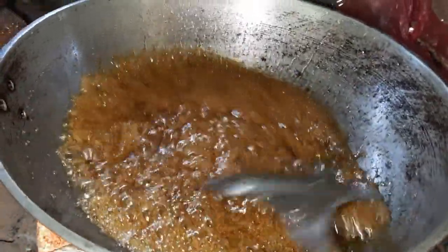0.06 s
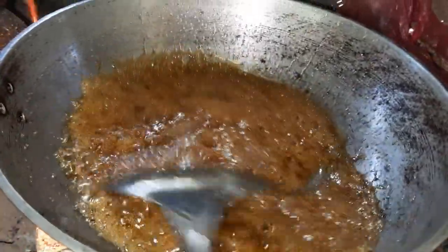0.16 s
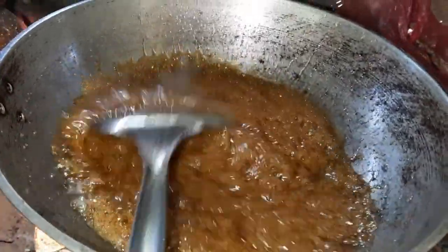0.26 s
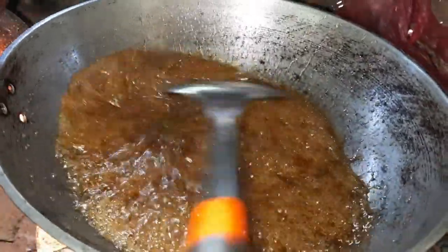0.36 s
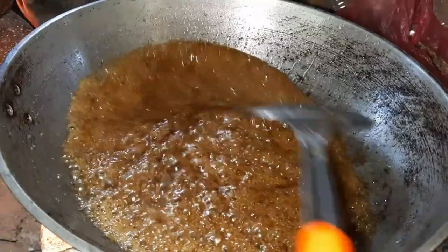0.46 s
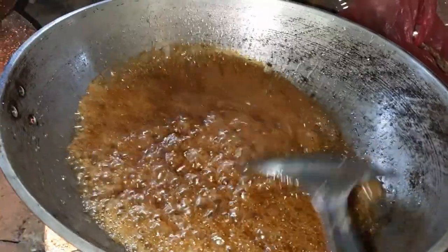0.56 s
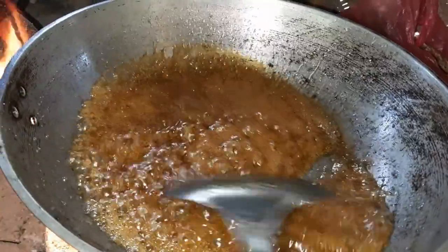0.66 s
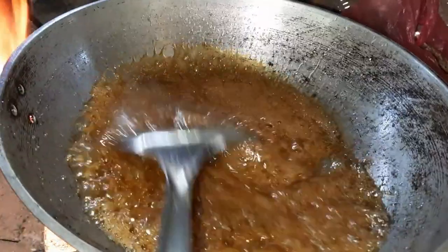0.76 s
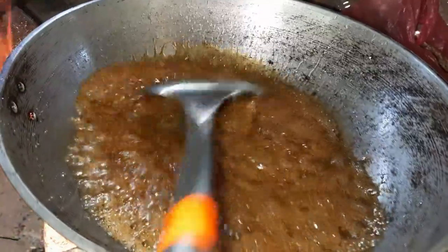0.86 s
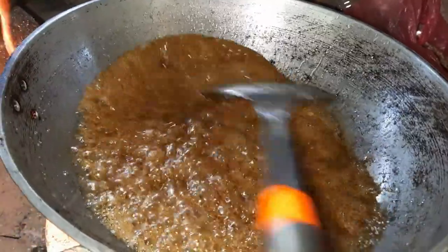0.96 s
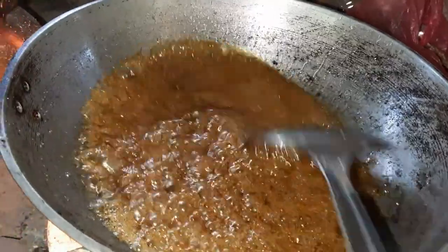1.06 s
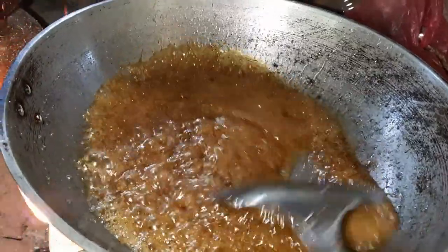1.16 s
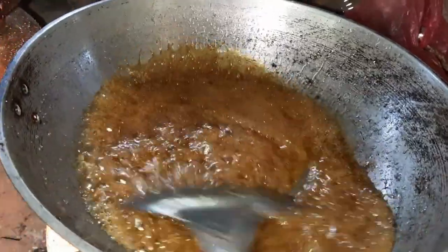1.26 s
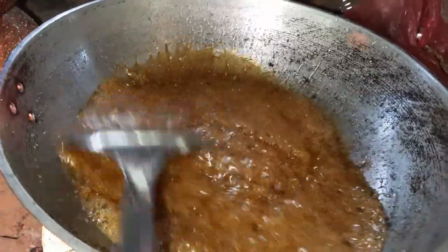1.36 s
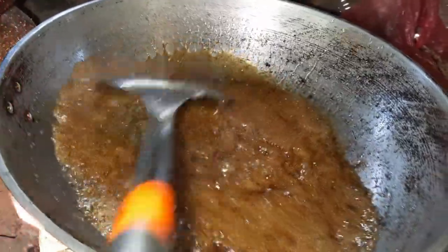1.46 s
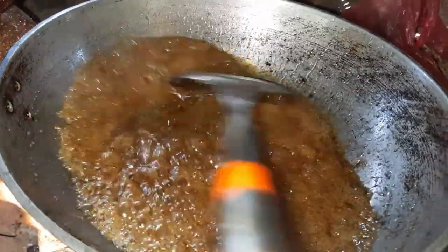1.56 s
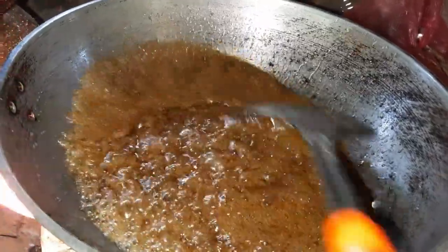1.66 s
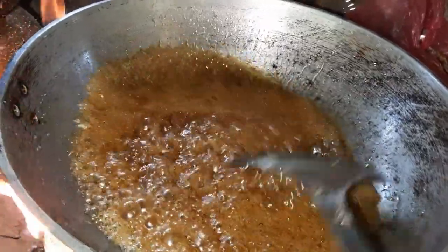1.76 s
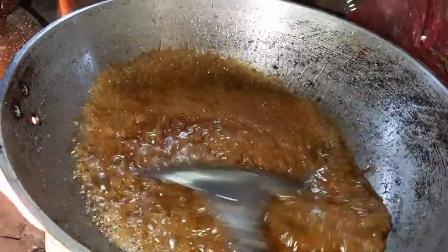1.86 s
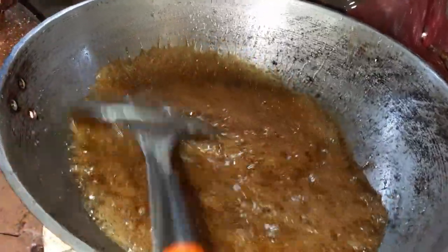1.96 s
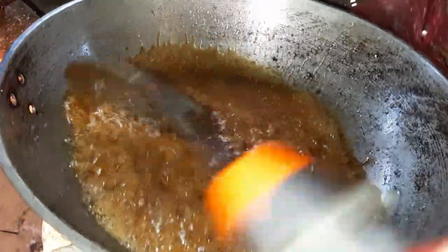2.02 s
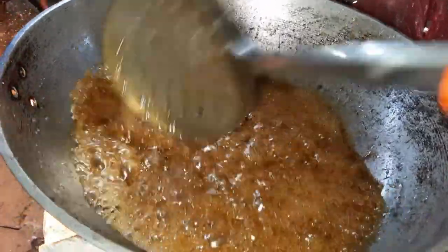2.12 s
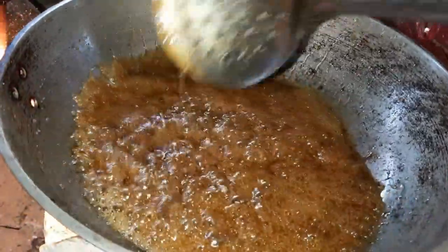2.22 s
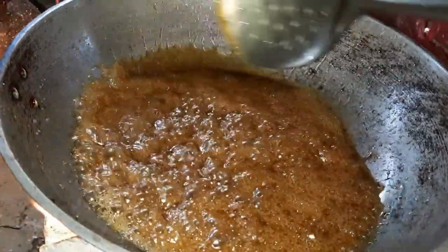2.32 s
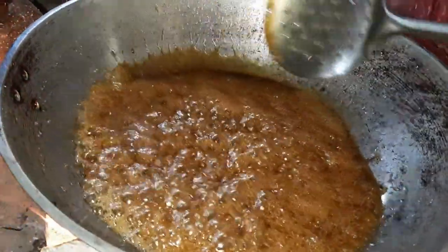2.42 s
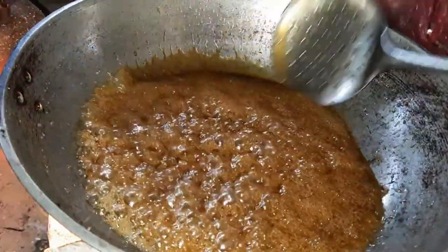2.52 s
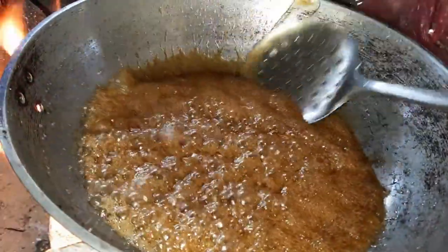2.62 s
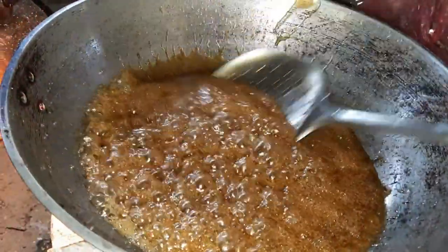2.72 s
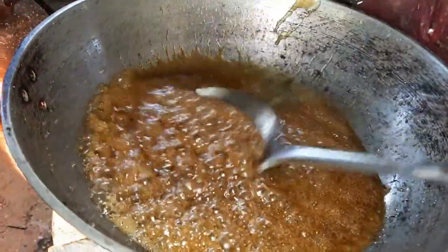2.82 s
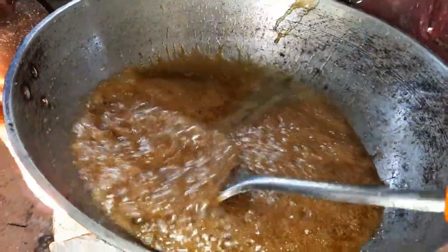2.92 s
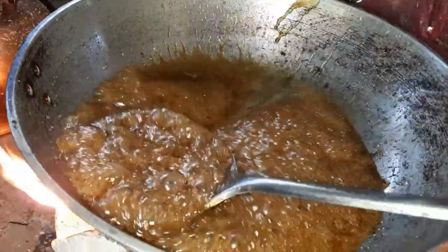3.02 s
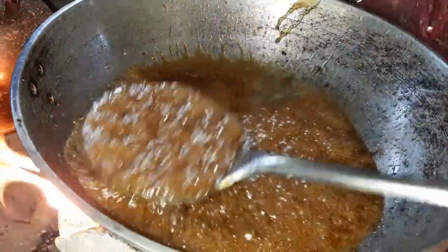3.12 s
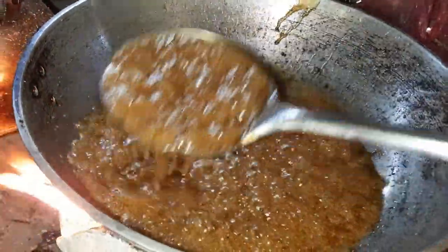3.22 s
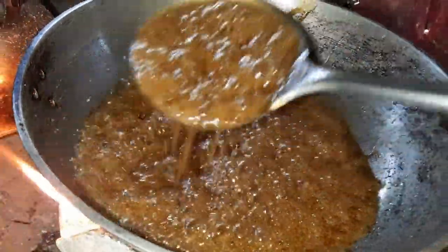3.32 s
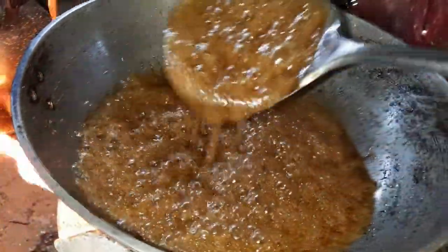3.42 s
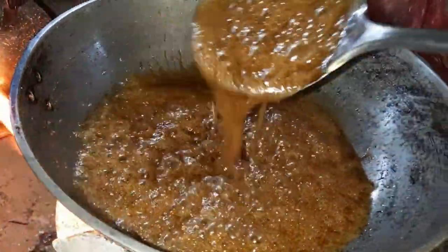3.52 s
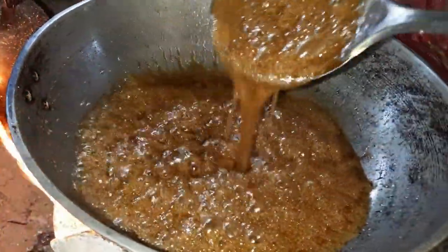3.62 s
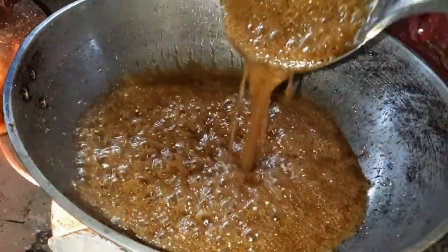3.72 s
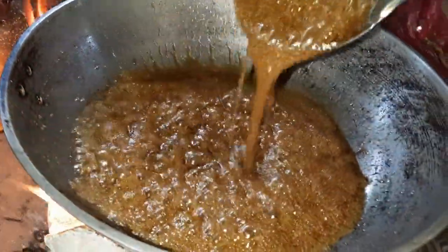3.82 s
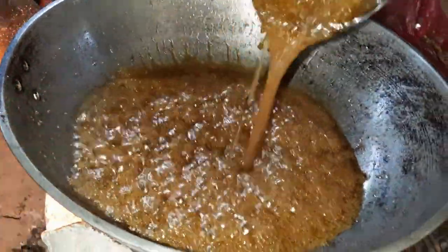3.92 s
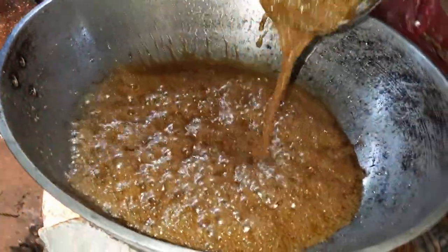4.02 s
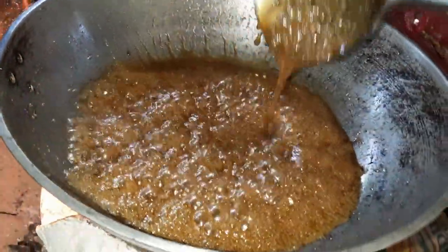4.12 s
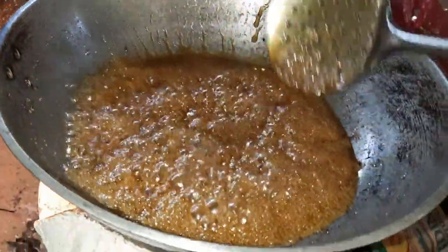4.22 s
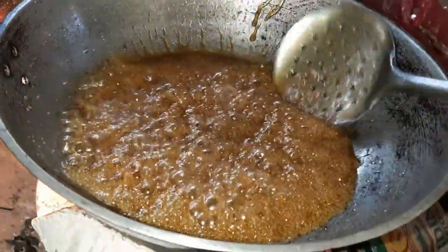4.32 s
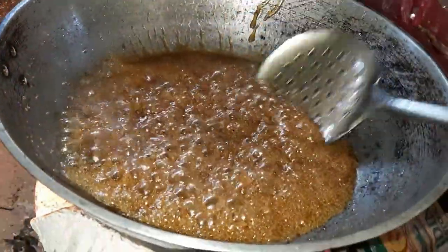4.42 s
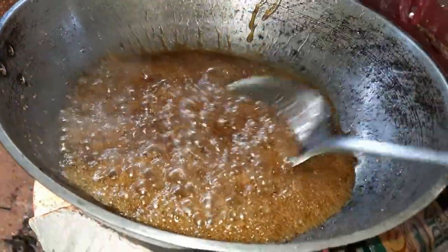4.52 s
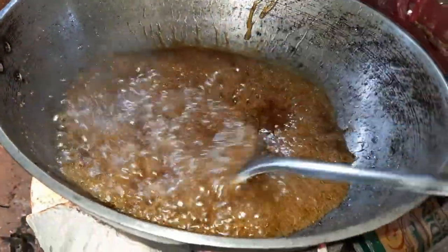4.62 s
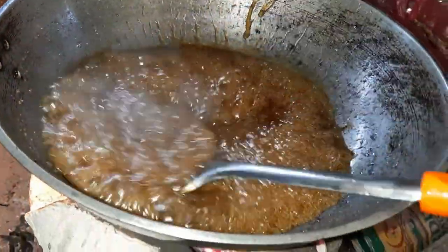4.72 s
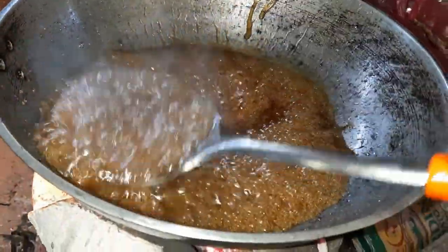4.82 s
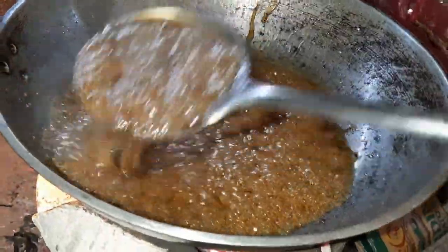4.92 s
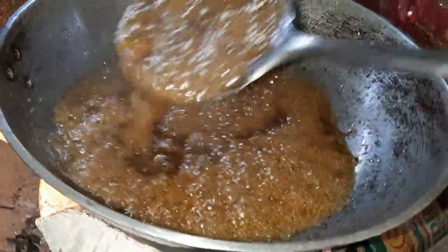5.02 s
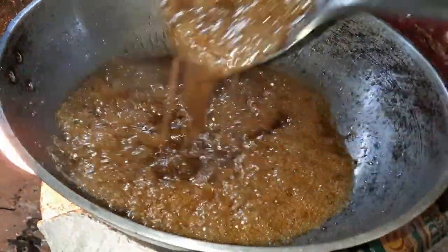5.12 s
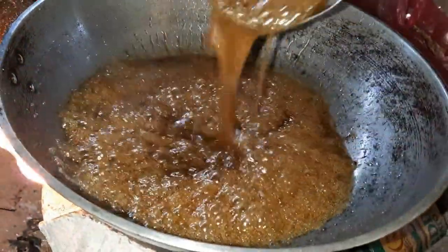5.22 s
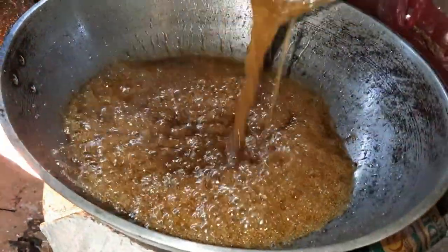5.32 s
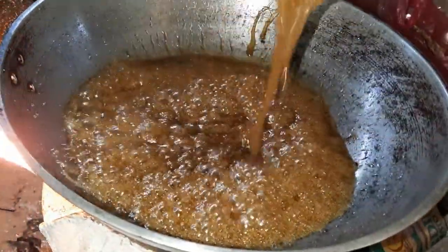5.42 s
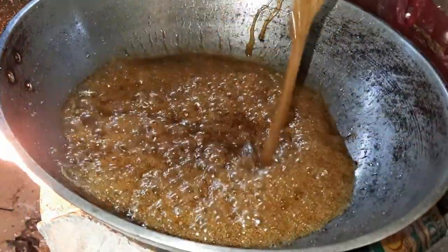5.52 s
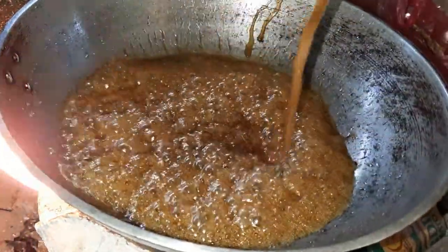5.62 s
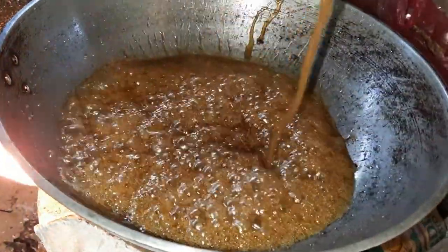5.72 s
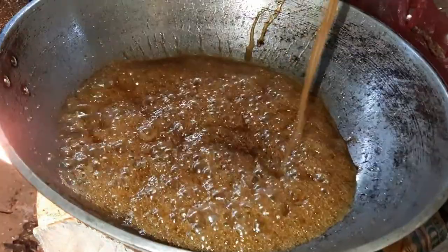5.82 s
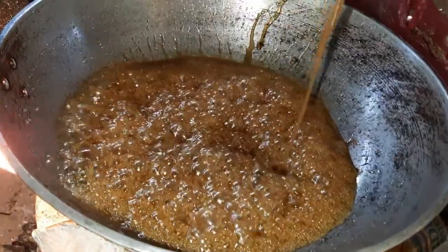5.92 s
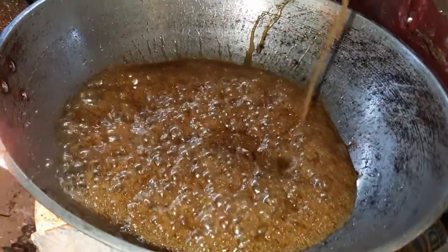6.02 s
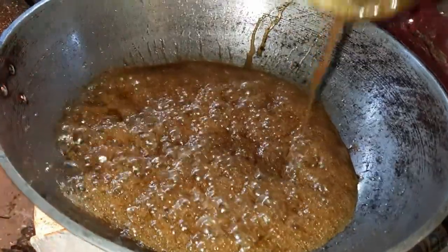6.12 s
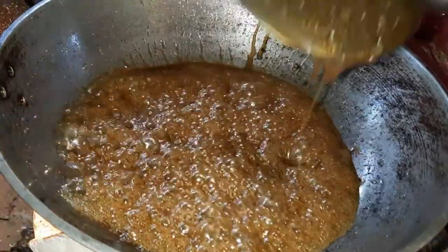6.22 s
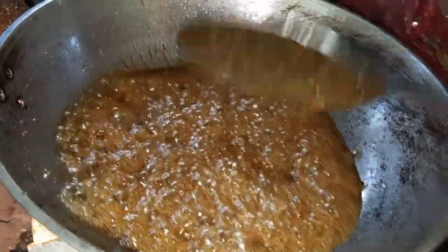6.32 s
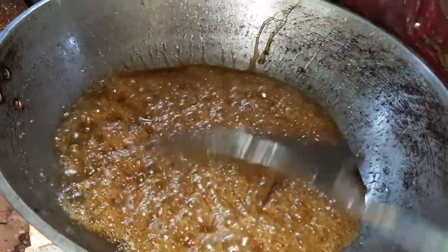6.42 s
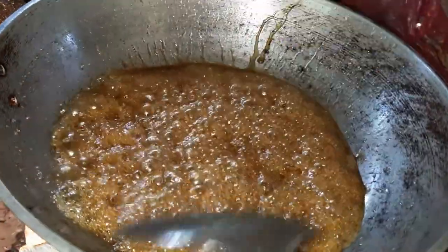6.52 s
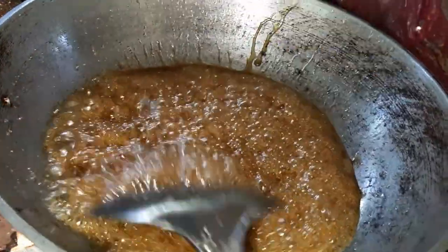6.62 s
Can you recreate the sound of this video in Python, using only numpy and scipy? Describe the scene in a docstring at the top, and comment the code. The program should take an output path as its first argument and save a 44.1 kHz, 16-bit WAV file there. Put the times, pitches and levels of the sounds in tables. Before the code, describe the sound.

Hoarse, ringing scrapes of metal on metal come first, swinging faster and slower, with a groaning stutter near the middle of the passage. Then quiet: thick syrup simmers and fizzes, the ladle taps and briefly skids on the wok, lumps fold in with glugs, bubbles pop crisply. Soft falling bird whistles come from the left before two strong, quickly damped clanks. Close, dry outdoor stereo with faint low rumble and thin hiss.

```python
"""A steel ladle scrapes round a large wok of boiling sugar syrup and knocks it, close to two microphone ports.
The scrape is rough noise shaken through the wok's modes; knocks are a crack and a damped ring of those modes.
The syrup fizzes and spits in bursts of noise, folds in with lumpy glugs, and closes over sine-like gulps.
Low noise rumbles and a thin hiss lie behind it, and near the end a far bird whistles in falling sine tones."""
import sys
import numpy as np
from scipy import signal
from scipy.fft import rfft, irfft, next_fast_len
from scipy.io import wavfile
from scipy.ndimage import uniform_filter1d, map_coordinates

SR = 44100
rng = np.random.default_rng(int(sys.argv[2]) if len(sys.argv) > 2 else 0)


def output_pcm(signal):
    """Save a mono or channel-first signal as 16-bit PCM at the path in sys.argv[1].

    Samples are clipped to [-1, 1] before scaling.
    """
    pcm = np.clip(np.atleast_2d(signal).T, -1, 1) * 32767
    wavfile.write(sys.argv[1], SR, np.round(pcm).astype(np.int16))


def voltage_ratio(level):
    """Linear amplitude factor for a level in decibels (scalar or array-like)."""
    return 10 ** (np.asarray(level, float) / 20)


N = 294147  # length [samples]

# How the two ports differ: left minus right (frequency [Hz], level [dB])
PORT_BALANCE = [(60, 7.5), (110, -2.5), (200, 4), (380, -5.5), (700, -1), (1290, 2), (2380, 5), (4400, -2),
                (8120, -1.5), (15000, 4.5)]
# How alike the two ports hear (frequency [Hz], correlation [0 to 1])
PORT_LIKENESS = [(30, 0.44), (60, 0.89), (400, 0.81), (800, 1), (1500, 0.61), (4000, 0.15), (12000, 0.12)]
# How late the left port hears (frequency [Hz], delay [s])
PORT_LAG = [(600, 0.00017), (1500, 0.00022), (2800, 0.00029)]

# Tone of the rumbles (frequency [Hz], relative level [dB])
RUMBLE_TONE = [(15, -31.5), (25, -34.5), (65, -3), (108, -2), (156, -8), (220, -9.5), (290, -51.5),
               (480, -120)]
# Low rumbles: wind gusts, and thumps through the handle at knocks
# (time of peak [s], level [dB], swell length [s])
RUMBLES = [(0.973, -62, 0.24), (1.43, -49, 0.014), (1.515, -51, 0.028), (1.91, -72, 0.29),
           (2.589, -48, 0.025), (4.438, -53, 0.043), (5.11, -50, 0.042), (5.407, -57, 0.053),
           (5.763, -63.5, 0.18), (6.346, -52, 0.1), (6.67, -51.5, 0.073)]
CALM_DB, RUMBLE_FALL = -79, 0.61  # level between rumbles; fade time over swell length
# Steady narrow hiss, perhaps far insects (centre [Hz], width [Hz], level [dB])
SHRILL_BANDS = [(7760, 570, -72.5), (11260, 450, -69.5)]

# Falling bird whistles (start [s], length [s], first pitch [Hz], last pitch [Hz], level [dB])
WHISTLES = [(6.06, .05, 2400, 2270, -63), (6.265, .11, 2390, 2170, -49), (6.47, .115, 2410, 2150, -49)]
# The bird sits to the left; each whistle grows by the swell
BIRD_RIGHT_DB, BIRD_LEFT_LAG_S, BIRD_SWELL_DB = -6, 0.00007, 8

# Tone of the fizz (frequency [Hz], relative level [dB])
FIZZ_TONE = [(35, -37), (60, -12), (180, -43.5), (391, -8), (808, -4.5), (952, -11), (1490, -0.5),
             (1670, -7.5), (2060, -2.5), (2320, -9), (4470, -9.5), (9020, -17), (11100, -8), (15100, -12.5),
             (16200, -23)]
# How hard the syrup boils, livelier where ladle or poured stream disturbs it (time [s], relative level [dB])
FROTH = [(2.05, -52.5), (2.16, -66.5), (2.39, -63), (2.62, -70.5), (2.8, -59), (2.99, -63), (3.31, -66),
         (3.8, -64), (4.42, -66.5), (4.62, -57), (4.84, -68), (5.15, -64.5), (5.27, -64), (5.39, -60),
         (5.62, -61), (5.88, -60), (6.1, -65), (6.29, -61.5), (6.47, -65)]
TOP_DB, TOP_GROWS = -6.5, 0.3  # treble gain in the fizz; dB gained for each dB of fizz
# Changes in the treble of the fizz (time of peak [s], treble change [dB], rise [s], fall [s])
FIZZ_TREBLE = [(2.05, -11.5, 0.052, 0.099), (2.75, 4.5, 0.13, .2), (4.84, 10.5, 0.074, 0.046),
               (5.4, 5, 0.17, 0.21)]
# Louder bursting blisters (time [s], relative level [dB], pitch [Hz])
SPITS = [(2.121, -38, 6000), (2.2055, -39, 12900), (2.3377, -34, 4400), (2.403, -44, 5500),
         (3.9029, -27.5, 3630), (3.966, -37, 5300), (4.035, -32, 13000), (4.1829, -35, 12000),
         (4.2408, -38, 5240), (5.235, -38, 11450), (5.412, -28.5, 2910), (5.4415, -24, 7900),
         (5.458, -22.5, 7000), (5.515, -33, 4280), (5.5907, -27.5, 13000), (5.6087, -22, 4100),
         (5.685, -35.5, 2500), (5.712, -28.5, 5270), (5.743, -20.5, 6800), (5.8165, -26, 14000),
         (5.822, -27.5, 4020), (5.9246, -26.5, 6160), (5.955, -32, 6500), (5.9866, -27.5, 5270),
         (6.073, -34, 12800), (6.11, -26.5, 2530), (6.26, -28.5, 4650), (6.4023, -29, 7100)]
# Tone of the glugs (frequency [Hz], relative level [dB])
GLUG_TONE = [(60, -42), (100, -15), (215, -10), (300, -3), (600, -8.5), (1100, -15), (2000, -14),
             (3500, -35), (6000, -74)]
GLUG_DB, GLUG_GROWS = -10, 1  # steady glugging next to the FROTH mean; dB gained for each dB of fizz
# Lumps of syrup folding in or landing (time of peak [s], level [dB], rise [s], fall [s])
PLOPS = [(1.413, -38.5, 0.012, 0.012), (1.503, -26, 0.013, 0.011), (2.05, -52, 0.051, 0.043),
         (2.16, -55, 0.016, 0.036), (2.62, -50.5, 0.036, 0.036), (2.87, -46, 0.0068, 0.084),
         (4.622, -58.5, 0.015, 0.063), (5.057, -51, 0.0048, .015), (5.09, -44.5, 0.015, 0.024),
         (5.128, -56.5, 0.0053, 0.046), (5.31, -54, 0.039, 0.02), (5.499, -50, 0.0035, 0.0038),
         (5.687, -49, 0.0035, 0.0043), (5.779, -46.5, 0.021, 0.026), (6.115, -57.5, 0.026, 0.079),
         (6.316, -45, 0.05, 0.043), (6.4, -51.5, 0.023, 0.066), (6.57, -55, 0.064, 0.2)]
# Big air pockets closing in the syrup (time [s], peak level [dB], pitch [Hz])
GULPS = [(2.999, -41, 514), (3.012, -40.5, 507), (5.036, -60, 305), (5.056, -50, 258), (5.075, -46, 302),
         (5.086, -36, 331), (5.122, -51, 261), (5.775, -43, 430), (6.28, -41, 417), (6.297, -41, 286),
         (6.315, -38, 290), (6.343, -44, 320), (6.393, -41, 266), (6.42, -43, 287), (6.455, -44.5, 485),
         (6.502, -48, 300), (6.539, -45, 305), (6.556, -59, 287)]
GULP_CYCLES, GULP_RISE = 2.6, 0.03  # envelope time scale in cycles; share the pitch climbs in that time

# The wok's modes (frequency [Hz], width [Hz], relative level [dB])
WOK_MODES = [(266, 19, -19), (407, 17.4, -3.5), (456.6, 100, -6), (547.4, 300, -7.5), (659, 82, 0),
             (717.6, 12, 5.5), (905, 52, -4.5), (1127, 140, -4.5), (1350, 50, 3.5), (1528, 22, 3),
             (1810, 36, 1), (2030, 51, -0.5), (2430, 175, -8.5), (2704, 99, -4.5), (3373, 500, -17),
             (4100, 170, -14.5), (4480, 160, -14.5), (4947, 160, -16.5), (5130, 120, -13),
             (5500, 370, -16.5), (6230, 150, -17.5), (6950, 510, -21.5), (7800, 23, -11.5)]
# Dense small modes in between (frequency [Hz], relative level [dB])
WOK_GRIT = [(35, -70), (60, -63), (217, -24.5), (398, -17.5), (515, -8.5), (636, 10), (822, -3.5),
            (1380, 2), (2190, -3), (2650, -15.5), (11500, -20), (14900, -23.5), (16000, -58.5)]
# Knocks of ladle on wok (time [s], relative level [dB], bowl's deep voice [dB], first crack [dB],
# favoured ring [Hz])
KNOCKS = [(0.0736, -25.5, 1, 16.5, 1350), (0.5294, -20, 8, -2, 1220), (0.8898, -37.5, 16, 17, 1380),
          (1.4144, -31, 22, -1, 1290), (1.4405, -27, 2, 11, 1180), (1.5016, -17.5, -6, 19, 1410),
          (1.522, -21, -4, 7, 1380), (1.579, -26, 10, -2, 1510), (2.5552, -41, -31, 7, 2720),
          (2.578, -30.5, 23, 9, 446), (2.7163, -32, -28, 2.5, 4800), (2.8395, -38, 8, 8, 2030),
          (3.2443, -38, -4, 13.5, 2070), (4.3768, -16, 5.5, 13, 2360), (4.3924, -38, -5, 6, 704),
          (4.5655, -38, 0, 5, 1000), (4.5769, -41, -8, -2, 1300), (4.5859, -27, -0.5, 16, 1350),
          (4.594, -41, -19, 13.5, 1310), (4.6175, -32.5, -4, 12, 1510), (4.6228, -45, 18.5, 16, 1300),
          (4.628, -38, 19, 3, 900), (4.6585, -35.5, 8.5, 6, 690), (4.671, -39, -1, 9, 580),
          (6.5773, -5, -5.5, 6.5, 1270), (6.6453, -8, 0.5, 8.5, 1170)]
KNOCK_T60_S = 0.07  # time for a 60 dB decay at 1000 Hz
BOWL_HZ, BOWL_WIDE = 620, 0.52  # centre of the bowl's deep voice and its width in log frequency
CRISP_HZ, SOFT_FROM_DB = 16000, 9  # treble limit; bowl level above which syrup cushions the blow

# Short slides of the ladle (time of peak [s], upper drone level [dB], rise [s], fall [s], brightness [dB])
SLIDES = [(2.627, -60.5, 0.019, 0.03, 20.5), (2.862, -34, 0.017, 0.016, 2), (2.905, -51, 0.016, 0.078, 4.5),
          (3.003, -62, 0.0041, 0.078, -42), (4.397, -31, 0.0018, 0.0085, 2),
          (4.472, -45, 0.036, 0.012, 12.5), (4.576, -31.5, 0.0083, 0.023, 0.5),
          (4.62, -48.5, 0.0029, 0.024, 3.5), (4.665, -55.5, 0.0086, 0.052, -6),
          (4.779, -69, 0.011, 0.044, 16), (6.598, -46.5, 0.012, 0.026, 22.5),
          (6.668, -24.5, 0.0019, 0.043, -21)]
# Where each short slide touches (time [s], favoured ring [Hz], favoured rasp [Hz])
SLIDE_SPOTS = [(2.62, 2130, 4700), (2.66, 1500, 5230), (2.86, 2070, 4300), (2.9, 1193, 4350),
               (4.4, 2180, 4280), (4.45, 1340, 3280), (4.49, 1340, 3400), (4.58, 1210, 4580),
               (4.78, 2120, 5500), (6.6, 1500, 4480)]
SLIDE_DEEP_DB = -63  # any light slide stirs the deep drone about as much

# Regular slips under the hardest push (time [s], slip rate [Hz], level [dB])
JUDDER = [(1.4, 620, -50), (1.442, 620, -23), (1.458, 560, -30), (1.478, 420, -27), (1.492, 475, -19),
          (1.503, 450, -15), (1.512, 430, -22), (1.534, 455, -20), (1.541, 460, -50)]
# Multiples 1 to 4 of the slip rate (relative level [dB])
JUDDER_OVERTONES = [0, -11, -8, -22]

# The ladle edge dragged round the wok until it lifts off
# (time [s], speed as level [dB], pressure as level [dB], favoured ring [Hz])
DRAG = [(0.0, -36, -38, 1750), (0.05, -27.5, -43, 1790), (0.13, -35, -45.5, 1480), (0.26, -25, -30.5, 1580),
        (0.42, -36.5, -40, 1510), (0.53, -33, -42, 1460), (0.59, -27, -44.5, 1520), (0.69, -35, -42, 1390),
        (0.73, -29.5, -31, 1630), (0.81, -27.5, -34, 1530), (0.92, -35.5, -35, 1440),
        (0.98, -39, -40.5, 1430), (1.1, -28.5, -41.5, 1640), (1.2, -29.5, -44, 1460),
        (1.27, -35, -42, 1405), (1.34, -37.5, -43.5, 1490), (1.45, -26.5, -33.5, 1220),
        (1.56, -34.5, -40.5, 1390), (1.72, -36, -44.5, 1840), (1.76, -42, -49.5, 1710),
        (1.83, -31.5, -49, 1400), (1.91, -29, -33.5, 1630), (2.03, -36, -40.5, 1940),
        (2.05, -67, -60, 1350), (2.2, -65.5, -71, 1650)]
# Rasp pitch favoured by the place the edge touches (time [s], pitch [Hz], lift [dB])
RASP_SPOTS = [(0, 4580, 5), (.14, 4000, 7.5), (.25, 4460, -1), (.5, 4340, 2.5), (.6, 4100, 11.5),
              (.78, 4630, -2.5), (.97, 5100, 1.5), (1.05, 4000, 10), (1.2, 4100, 10.5), (1.3, 4240, 0.5),
              (1.63, 4670, 3), (1.7, 3800, 10), (2.05, 4430, 1)]
# Rasp next to ring; deep drone next to upper drone, and the size of its wander
RASP_DB, DEEP_DB, DEEP_WAVER_DB = 0.5, -8, 6
RING_LIFT_DB, RING_BLURS = 12.5, 1  # favoured ring at a speed of -34.5 dB; dB lost for each dB of speed
# The ladle bears down and the whole bowl drones (time of peak [s], deep level [dB], rise [s], fall [s])
BEARS = [(0.917, -38, 0.013, 0.015), (1.335, -38, 0.046, 0.026), (1.5, -37, 0.022, 0.073),
         (1.759, -47, 0.033, 0.019), (1.99, -46.5, 0.02, 0.03)]
BEAR_UPPER_DB, BEAR_RING_DB = -21, -17  # upper drone and ring next to the deep drone
CATCHES_PER_S, CATCH_DB = 400, 12  # snags on rough spots; a typical snag next to the fine grain


def unit(x):
    """Scale a sound to an rms of 1."""
    return x / np.sqrt(np.mean(x ** 2) + 1e-20)


def along(points, hz):
    """Read a curve of (frequency, value) points on a log frequency axis."""
    f, v = np.transpose(points)
    return np.interp(np.log(hz + 1), np.log(f + 1), v)


def curves(rows):
    """Give one value per sample for each column after the time."""
    s, *columns = np.transpose(rows)
    return [np.interp(np.arange(N) / SR, s, column) for column in columns]


def wobble(rate):
    """Make a smooth random curve with rate knots a second."""
    knots = rng.standard_normal(int(N * rate / SR) + 4)
    return map_coordinates(knots, [np.arange(N) * rate / SR])


def stroke(s, db, rise, fall):
    """Shape a quick swell and an exponential fade, with times in seconds."""
    t = np.arange(N) / SR
    return voltage_ratio(db) * np.exp(-np.where(t < s, ((s - t) / rise) ** 2, (t - s) / fall))


def filtered(x, response):
    """Multiply the spectrum of x by a response, which may be complex."""
    m = next_fast_len(x.shape[-1] + 8192)
    return irfft(rfft(x, m) * response(np.fft.rfftfreq(m, 1 / SR)), m)[..., :x.shape[-1]]


def patchy(x, depth_db, ridges=()):
    """Vary the gain in random patches of time and pitch, and lift ridges along given pitch curves."""
    hz, t, z = signal.stft(x, SR, nperseg=1024)
    field = rng.standard_normal(z.shape[1:])
    field = uniform_filter1d(uniform_filter1d(field, 3, 0), 7, 1)
    gain_db = depth_db * unit(field) * np.clip(hz[:, None] / 4500, 0.25, 1)  # low pitches hold steadier
    for centre, lift_db, share in ridges:
        at, lift = (np.interp(t * SR, np.arange(N), c + 0 * centre) for c in (centre, lift_db))
        gain_db = gain_db + lift * np.exp(-(np.log((hz[:, None] + 1) / at) / share) ** 2)
    return signal.istft(z * voltage_ratio(gain_db), SR, nperseg=1024)[1][:, :N]


def ports(pair):
    """Mix two strands so that both ports share part of the sound and the left hears it late."""
    def turn(hz):
        return np.arccos(np.clip(along(PORT_LIKENESS, hz), 0, 1)) / 2

    def tilt(hz):  # half the balance and half the lag; the other port gets the inverse
        return voltage_ratio(along(PORT_BALANCE, hz) / 2) * np.exp(-1j * np.pi * hz * along(PORT_LAG, hz))

    mid, side = filtered(pair, lambda hz: np.array([np.cos(turn(hz)), np.sin(turn(hz))]))
    return filtered(np.array([mid + side, mid - side]), lambda hz: np.array([tilt(hz), 1 / tilt(hz)]))


def rumble_and_hiss():
    """Gusts and handle thumps are low noise that swells and fades; the hiss is steady narrow-band noise."""
    low_noise = filtered(rng.standard_normal((2, N)), lambda hz: voltage_ratio(along(RUMBLE_TONE, hz)))
    swells = sum(stroke(s, db, length, RUMBLE_FALL * length) for s, db, length in RUMBLES)
    out = (voltage_ratio(CALM_DB) + swells) * unit(voltage_ratio(4.5 * wobble(14)) * low_noise)
    for centre, width, db in SHRILL_BANDS:
        hiss = filtered(rng.standard_normal((2, N)), lambda hz: np.exp(-((hz - centre) / width) ** 2))
        out += voltage_ratio(db) * unit(hiss)
    return out


def bird():
    """Soft whistles are sine tones that fall in pitch and swell towards their end."""
    out = np.zeros(N + SR)
    for s, length, from_hz, to_hz, db in WHISTLES:
        u = np.linspace(0, 1, round(length * SR))
        pitch = to_hz + (from_hz - to_hz) * (1 - u) ** 1.5
        level = voltage_ratio(db + BIRD_SWELL_DB * (u - 1)) * np.sin(np.pi * u) ** 0.11
        out[round(s * SR):][:len(u)] += level * np.sin(2 * np.pi * np.cumsum(pitch) / SR)
    out = out[:N] * voltage_ratio(1.2 * wobble(60))

    def place(hz):
        return np.array([np.exp(-2j * np.pi * hz * BIRD_LEFT_LAG_S), voltage_ratio(BIRD_RIGHT_DB) + 0 * hz])

    return filtered(np.array([out, out]), place)


def blisters(s, db, hz, puff_s):
    """Each burst is a click and a short puff of steam: noise around the blister's pitch."""
    t = np.arange(1536) / SR
    f = np.fft.rfftfreq(1536, 1 / SR) + 1
    noise = rng.standard_normal((len(s), 1536))
    puff = irfft(rfft(noise) / (1 + (np.log(f / hz[:, None]) / 0.49) ** 2))
    puff = puff / puff.std(1, keepdims=True)
    click_shape = 1.1 * np.exp(-t / 0.0006)
    puff_shape = 0.5 * np.exp(-t / puff_s) * (1 - np.exp(-t / 0.002))
    grain = voltage_ratio(db)[:, None] * puff * (click_shape + puff_shape)
    at = (s * SR).astype(int)[:, None] + np.arange(1536)
    return np.bincount(at.ravel(), grain.ravel(), N + 1536)[:N]


def fizz(fizz_db, lively_db):
    """Fine fizz is patchy hiss with small random blisters on top, and its treble rises and dips."""
    def fizz_tone(hz):
        return voltage_ratio(along(FIZZ_TONE, hz))

    hiss = unit(filtered(patchy(rng.standard_normal((2, N)), depth_db=3.7), fizz_tone))
    draw = rng.random((700, 3))  # time, size and pitch of each small blister
    size_db = np.minimum(-4 * np.log(draw[:, 1]), 11)
    small = blisters(draw[:, 0] * (N - 1) / SR, size_db, 3000 * 5 ** draw[:, 2], puff_s=0.0025)
    small = filtered(small, lambda hz: voltage_ratio(2.5 * along(FIZZ_TONE, hz)))
    body = hiss + 0.4 * unit(small) * [[1], [0.5]]
    top = filtered(body, lambda hz: 1 / (1 + (9000 / (hz + 1)) ** 6))
    treble_db = sum(change_db * stroke(s, 0, rise, fall) for s, change_db, rise, fall in FIZZ_TREBLE)
    top_db = TOP_DB + TOP_GROWS * lively_db + treble_db
    flicker_db = 1.3 * wobble(45)
    return voltage_ratio(fizz_db + 7.5 + flicker_db) * (body + (voltage_ratio(top_db) - 1) * top)


def glugs(fizz_db, lively_db):
    """Thick syrup folding in is low noise of lumpy strength, louder at each plop."""
    lumps = voltage_ratio(1.5 * wobble(40) + 2.2 * wobble(110))
    noise = filtered(rng.standard_normal((2, N)), lambda hz: voltage_ratio(along(GLUG_TONE, hz)))
    glug_db = fizz_db.mean() + GLUG_DB + GLUG_GROWS * lively_db
    return unit(lumps * noise) * (voltage_ratio(glug_db) + sum(stroke(*plop) for plop in PLOPS))


def syrup():
    """The strength of the boil drives both fizz and glugs; louder blisters burst over them."""
    fizz_db, = curves(FROTH)
    lively_db = fizz_db - fizz_db.mean()
    s, db, hz = np.transpose(SPITS)
    spits = blisters(s, db - 12.5, hz, puff_s=0.0092) * [[1], [0.5]]
    return fizz(fizz_db, lively_db) + glugs(fizz_db, lively_db) + spits


def gulps():
    """Each closing air pocket rings as a soft-started sine that climbs a little and dies."""
    out, t = np.zeros(N + SR), np.arange(SR // 10) / SR
    for s, db, hz in GULPS:
        u = t * hz / GULP_CYCLES
        envelope = 2 * np.e * u * np.exp(-2 * u)  # peaks at 1
        tone = np.sin(2 * np.pi * hz * t * (1 + GULP_RISE * u / 2))
        out[round(s * SR):][:len(t)] += voltage_ratio(db) * envelope * tone
    return out[:N] * [[1], [0.3]]


def wok(hz, grit_db=-8):
    """The bowl answers at its modes, over a dense background of small ones."""
    modes = 0
    for k, (centre, width, db) in enumerate(WOK_MODES):
        peak = 1j * hz * width / (centre ** 2 - hz ** 2 + 1j * hz * width)
        modes = modes + (-1) ** k * voltage_ratio(db) * peak
    return np.sqrt(abs(modes) ** 2 + voltage_ratio(grit_db + along(WOK_GRIT, hz)) ** 2)


def knocks():
    """A sharp crack, then every mode at a strength set by the spot struck, damped by syrup and hand."""
    def cut(x, hz, kind):
        return signal.sosfilt(signal.butter(4, hz, kind, fs=SR, output="sos"), x)

    out, t = np.zeros((2, N + SR)), np.arange(SR // 6) / SR
    hz, _, mode_db = np.transpose(WOK_MODES)[..., None]
    noises = rng.standard_normal((len(KNOCKS), 2, len(t)))
    noises = unit(filtered(noises, lambda f: wok(f, grit_db=-7) ** 0.5))
    for (s, db, bowl_db, crack_db, spot_hz), noise in zip(KNOCKS, noises):
        def touch(f):
            bowl_cut_db = min(bowl_db, 0) / (1 + (f / 1200) ** 3)  # a light touch leaves the bowl still
            return voltage_ratio(bowl_cut_db + 12 * np.exp(-(np.log((f + 1) / spot_hz) / 0.51) ** 2))

        noise = filtered(noise, touch)
        spot_db = bowl_db * np.exp(-(np.log(hz / BOWL_HZ) / BOWL_WIDE) ** 2)
        spot_db = spot_db + 9 * np.exp(-(np.log(hz / spot_hz) / 0.16) ** 2)
        strength = voltage_ratio(0.25 * mode_db + spot_db + rng.normal(0, 1.5, hz.shape))
        # one blow starts all modes nearly together
        phase = 2 * np.pi * (hz * t + 0.04 * rng.standard_normal(hz.shape))
        decay = voltage_ratio(-60 * t / KNOCK_T60_S * (hz / 1000) ** 0.028)
        ring = (strength * np.sin(phase) * decay).sum(0) * [[1], [0]]
        crack = (1.1 * ring + 0.6 * noise) * voltage_ratio(crack_db - 60 * t / 0.011)
        crack = cut(crack, 500, "high")  # the first instant is all edge
        blow = ring + 3 * noise * voltage_ratio(-60 * t / KNOCK_T60_S) + crack
        top_hz = np.clip(CRISP_HZ * voltage_ratio(-max(bowl_db - SOFT_FROM_DB, 0)), 800, 20000)
        blow = cut(blow * (1 - np.exp(-t / 0.00065)), top_hz, "low")
        out[:, round(s * SR):][:, :len(t)] += voltage_ratio(db - 18.5) * blow
    return cut(out[:, :N], 260, "high")  # the knocks carry nothing below about 260 Hz


def rubbed(ring_hz, rasp_hz, rasp_lift_db, depth_db, grit_db, rough_db, lift_db):
    """Rough grains shake the wok; give its deep drone, upper drone, ring and rasp, each of rms 1."""
    chatter = voltage_ratio(rough_db * wobble(70) + 0.47 * wobble(250) + 1.5 * wobble(700))
    snags = (rng.random(N) < CATCHES_PER_S / SR) * voltage_ratio(CATCH_DB) * rng.standard_normal(N) * [[1], [0]]
    grains = chatter * (rng.standard_normal((2, N)) + snags)
    ridges = [(ring_hz, lift_db, 0.08), (rasp_hz, rasp_lift_db, 0.1)]
    grains = patchy(grains, depth_db, ridges)

    def parts(hz):  # split at 488, 950 and 2200 Hz
        below = [1 / (1 + (hz / edge_hz) ** 8) for edge_hz in (488, 950, 2200)]
        return np.diff([0 * hz, *below, 1 + 0 * hz], axis=0)[:, None]

    return [unit(band) for band in filtered(grains, lambda hz: wok(hz, grit_db) * parts(hz))]


def slides():
    """Short skids rub the wok under the syrup, which blurs the modes."""
    gains = 0
    for s, db, rise, fall, bright_db in SLIDES:
        band_db = [[SLIDE_DEEP_DB], [db], [db + bright_db / 2], [db + bright_db - 1.5]]
        gains = gains + stroke(s, 0, rise, fall) * voltage_ratio(band_db)
    bands = rubbed(*curves(SLIDE_SPOTS), rasp_lift_db=6, depth_db=2.2, grit_db=-5, rough_db=1.8, lift_db=6)
    return sum(gain * band for gain, band in zip(gains, bands))


def judder():
    """The edge slips regularly: a rough tone at the slip rate with a few overtones."""
    hz, db = curves([(1.35, 600, -120)] + JUDDER + [(1.6, 460, -120)])
    phase = 2 * np.pi * np.cumsum(hz * (1 + 0.02 * wobble(200))) / SR
    tone = sum(voltage_ratio(overtone_db + 2 * wobble(150)) * np.sin(k * phase)
               for k, overtone_db in enumerate(JUDDER_OVERTONES, 1))
    return voltage_ratio(db) * tone * [[1], [0.3]]


def scrape():
    """Stick-slip grains shake the wok: pressure sets the drones, speed ring and rasp, place the pitches."""
    speed_db, press_db, ring_hz = curves(DRAG + [(2.3, -110, -110, 2030)])
    deep_db = press_db + DEEP_DB + DEEP_WAVER_DB * wobble(11)
    gains = voltage_ratio([deep_db, press_db, speed_db, speed_db + RASP_DB])
    gains[:3] += sum(stroke(*bear) for bear in BEARS) * voltage_ratio([[0], [BEAR_UPPER_DB], [BEAR_RING_DB]])
    ring_lift_db = np.clip(RING_LIFT_DB - RING_BLURS * (speed_db + 34.5), 0, 18)
    bands = rubbed(ring_hz, *curves(RASP_SPOTS), depth_db=4.5, grit_db=-9, rough_db=1.0,
                   lift_db=ring_lift_db)
    return sum(gain * band for gain, band in zip(gains, bands))


def scene():
    """Pass all but the bird through the ports' shared mix; the bird has its own place to the left."""
    near = rumble_and_hiss() + syrup() + gulps() + knocks() + slides() + judder() + scrape()
    return ports(near) + bird()


def top_cut(x):
    """Nothing passes above the cut-off."""
    return signal.sosfilt(signal.butter(12, 16470, fs=SR, output="sos"), x)


def record(dry):
    """Cut the treble steeply above about 15900 Hz and finish the mix."""
    mix = filtered(dry, lambda hz: 1 / (1 + (hz / 15900) ** 40))
    return top_cut(mix)


dry = scene()
out = record(dry)
output_pcm(out)
```